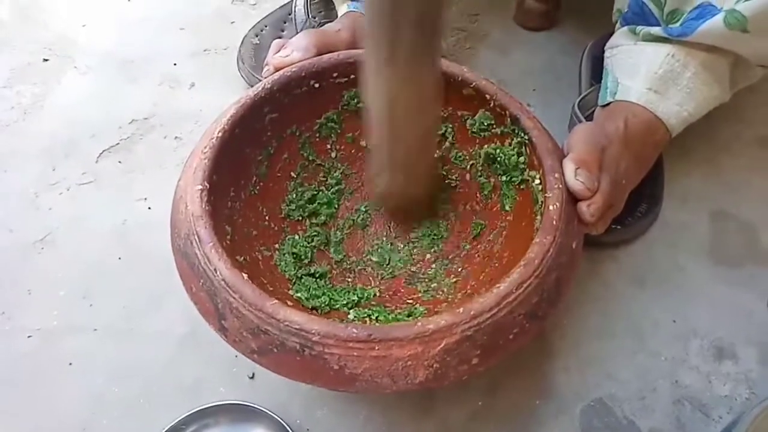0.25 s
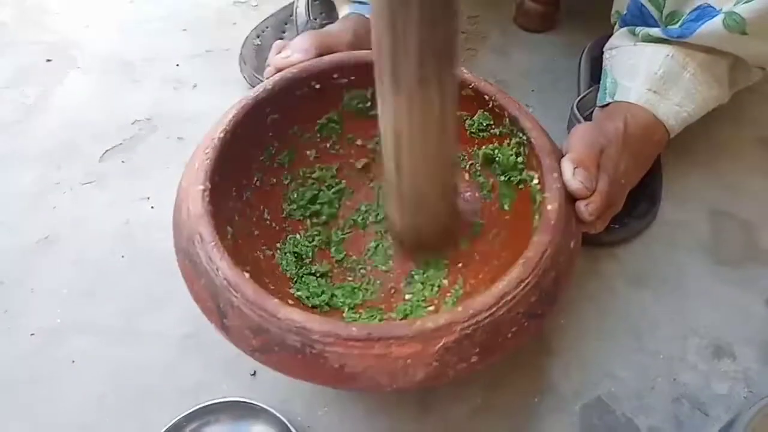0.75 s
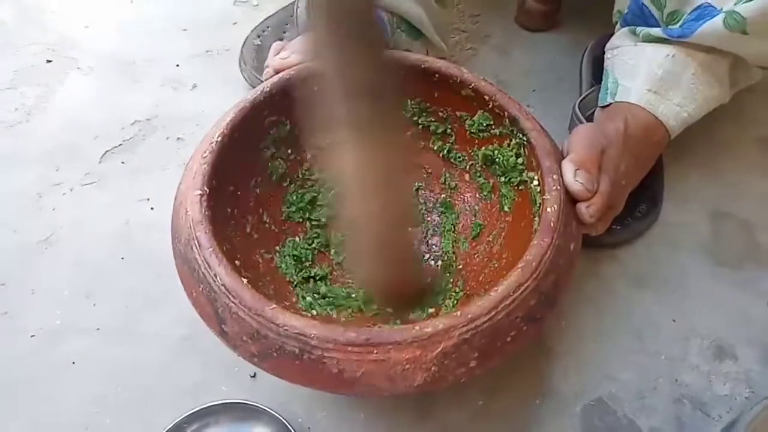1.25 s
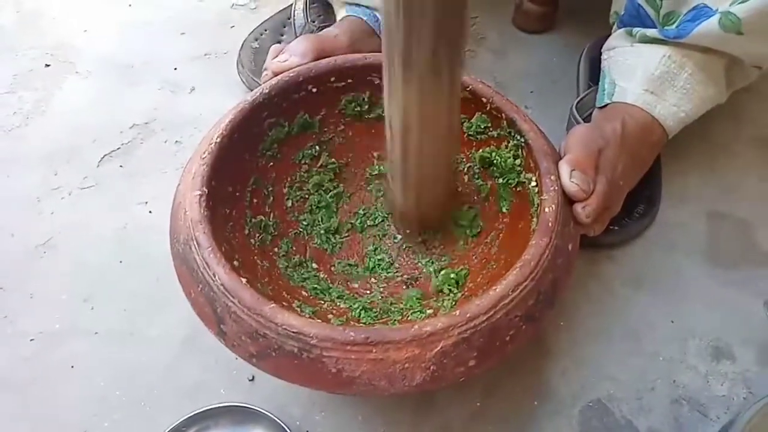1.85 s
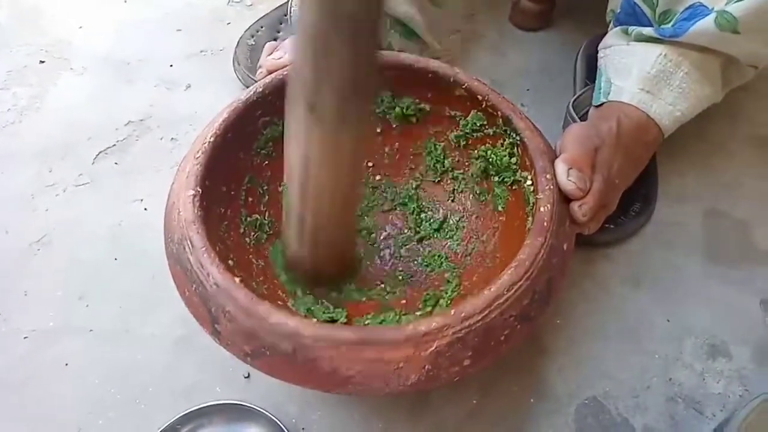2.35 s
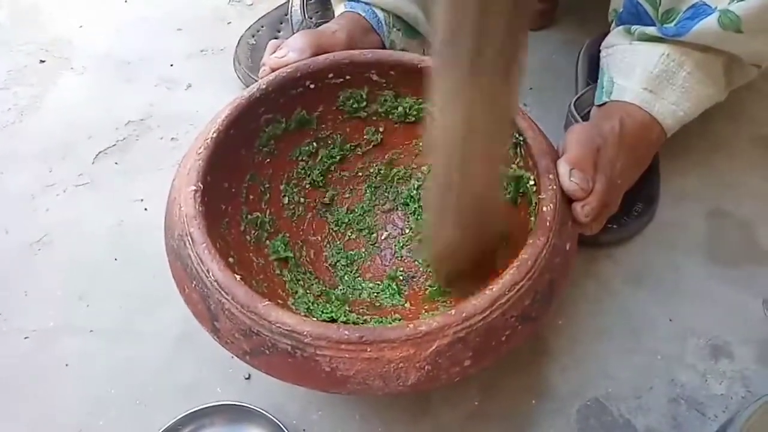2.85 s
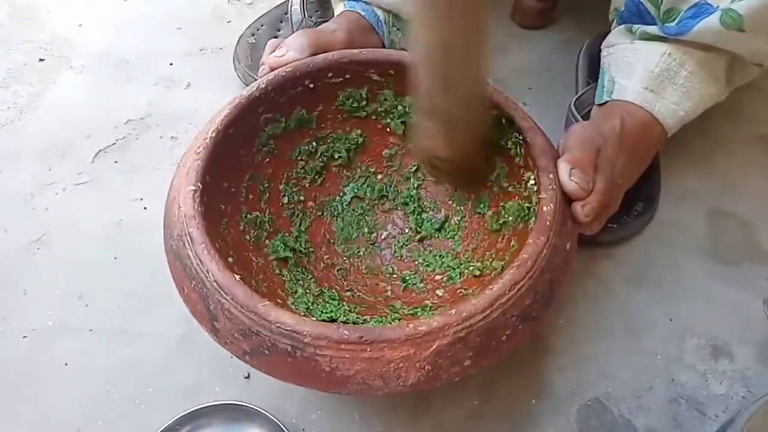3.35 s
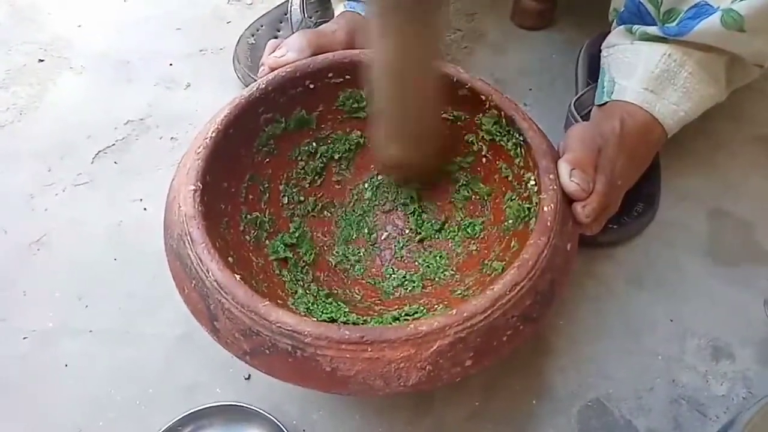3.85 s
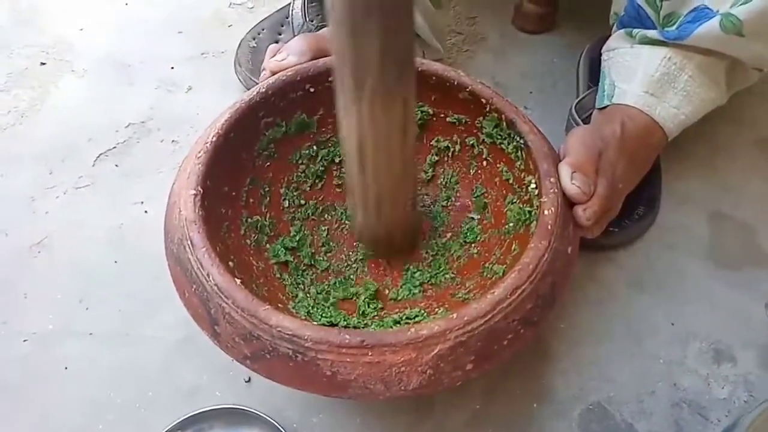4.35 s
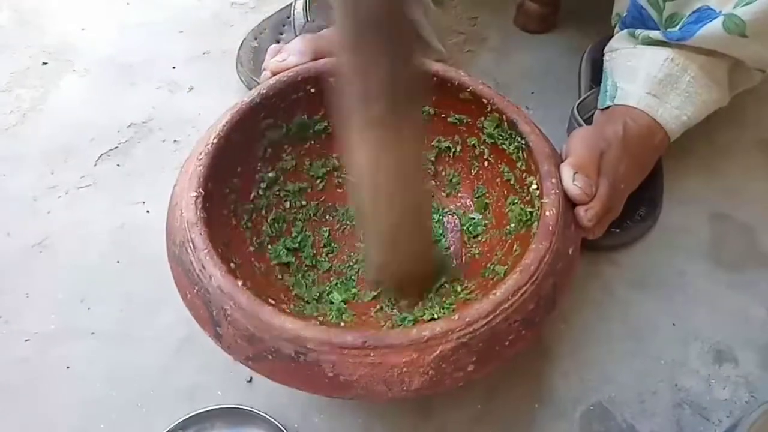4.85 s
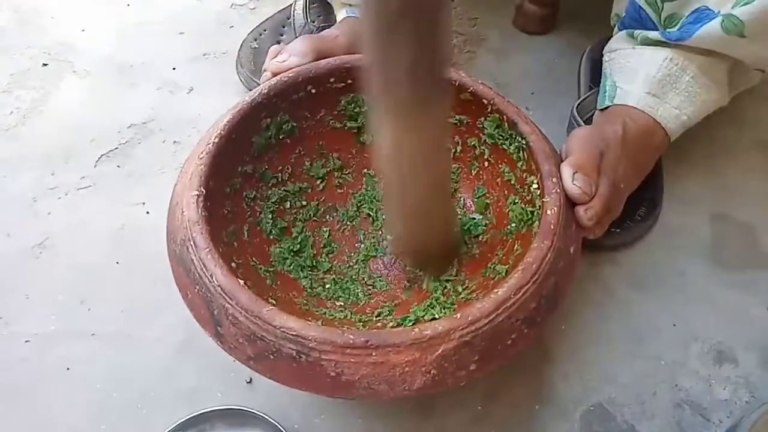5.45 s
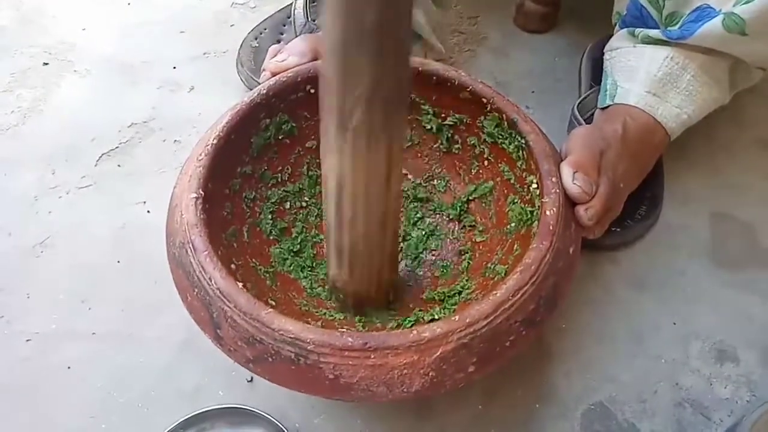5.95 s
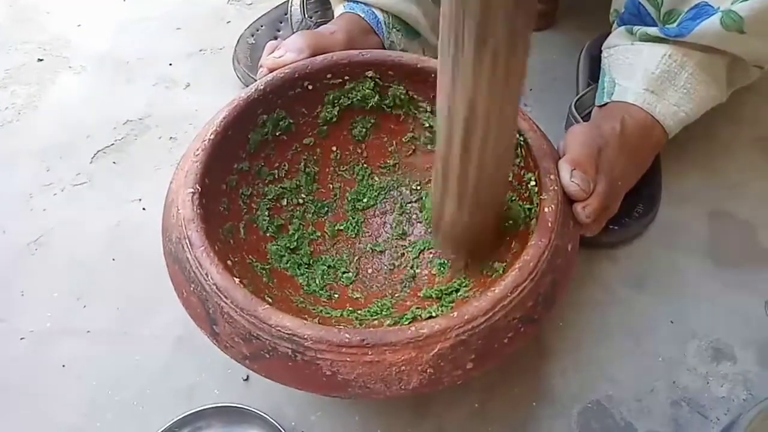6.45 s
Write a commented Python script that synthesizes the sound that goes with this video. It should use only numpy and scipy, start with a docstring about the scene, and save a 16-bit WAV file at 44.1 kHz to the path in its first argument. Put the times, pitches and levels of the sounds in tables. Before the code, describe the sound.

A wooden pestle works wet chopped herbs in a wide clay mortar, about four strokes a second from start to finish. Dull, hollow knocks and low thuds alternate with lighter gritty scrapes along the bowl. The paste crunches, leaves crackle, and seeds and stalks give occasional tiny snaps. The sound is close, with a very short reflection from nearby walls and a faint, steady outdoor hum and hiss.

```python
"""A long wooden pestle swings round a wide clay mortar on a concrete floor, about four strokes a second.
It bumps and skids over wet herbs: knocks and grit ring the same modes of bowl and pestle, from a low
floor thud up to a hard click. The paste crunches, leaves crackle, and seeds and stalks snap on top.
Nearby walls give a short tail, over a bed of outdoor murmur and hiss."""
import sys
import numpy as np
from scipy import signal
from scipy.fft import rfft, irfft, next_fast_len
from scipy.io import wavfile
from scipy.ndimage import map_coordinates

SR = 44100
rng = np.random.default_rng(int(sys.argv[2]) if len(sys.argv) > 2 else 0)


def generate_wav(sig):
    """Save sig (samples, or channels by samples) to the path in sys.argv[1] as 16-bit PCM at SR."""
    pcm = np.round(np.clip(np.atleast_2d(sig).T, -1, 1) * 32767).astype(np.int16)
    wavfile.write(sys.argv[1], SR, pcm)


N = 295029

# The heavy push of each round: (peak time [s], weight [dB], rasp [dB], crunch [dB], base fade [s])
HEAVY_PUSHES = [(0.005, -36.5, -34.5, -46, 0.058), (0.139, -20, -37, -36, 0.1),
                (0.383, -19.5, -42, -36, 0.15), (0.767, -25.5, -33.5, -42, 0.13),
                (0.996, -26.5, -34.5, -34, 0.095), (1.264, -21, -30, -42.5, 0.073),
                (1.537, -25, -37.5, -38, 0.065), (1.793, -19.5, -42.5, -35.5, 0.13),
                (2.033, -26.5, -36.5, -32.5, 0.1), (2.35, -21.5, -35, -32, 0.1),
                (2.654, -22, -33.5, -31, 0.2), (2.923, -20, -33, -30.5, 0.14),
                (3.215, -20, -32.5, -37, 0.25), (3.494, -28, -35.5, -36.5, 0.11),
                (3.745, -19, -29, -33.5, 0.09), (3.997, -20.5, -37, -40, 0.18),
                (4.256, -24.5, -42, -35, 0.082), (4.605, -29.5, -33, -40.5, 0.1),
                (4.871, -36, -34.5, -32.5, 0.081), (5.141, -20, -35, -40.5, 0.21),
                (5.42, -23.5, -42.5, -36, 0.11), (5.661, -17.5, -39, -36.5, 0.075),
                (5.927, -15.5, -37.5, -37.5, 0.17), (6.218, -16, -43, -39.5, 0.15),
                (6.556, -20, -38, -36, 0.12)]
# Lighter drags along the bowl: (peak time [s], weight [dB], rasp [dB], crunch [dB], base fade [s])
LIGHT_DRAGS = [(.242, -22, -47, -45, 0.053), (.519, -28, -31, -46, 0.059), (.579, -41, -35.5, -40, 0.17),
               (.685, -29, -32.5, -46.5, .067), (.93, -42, -39.5, -51, 0.11), (1.1, -47, -38, -50, .16),
               (1.321, -25.5, -56, -50.5, .12), (1.39, -35, -37, -51, 0.13),
               (1.639, -29, -39.5, -46, 0.081), (1.908, -23, -28.5, -49, 0.049),
               (2.147, -18, -30, -37.5, 0.07), (2.427, -28, -32, -36, 0.096), (2.59, -32, -38, -44, 0.057),
               (3.03, -34, -38.5, -53, 0.079), (3.13, -32, -42, -45.5, 0.1), (3.33, -36, -36, -58, .08),
               (3.435, -33, -40, -45, .1), (3.59, -47, -36.5, -50, 0.071), (3.813, -29.5, -37, -38, 0.092),
               (4.098, -25, -35, -36.5, 0.044), (4.351, -31.5, -43, -38, 0.21), (4.509, -37, -36, -45, .12),
               (4.673, -42, -36.5, -40.5, 0.18), (4.804, -42, -39, -52, 0.049),
               (4.929, -23, -42, -43, .083), (5.016, -43, -37, -47.5, 0.15), (5.25, -31, -43, -44.5, .11),
               (5.517, -36, -34, -37.5, 0.04), (5.738, -28, -46, -56, 0.14), (5.79, -39, -41, -49, 0.058),
               (6.049, -21.5, -40, -44, 0.088), (6.343, -33, -44, -46, .08), (6.64, -52, -39, -48, .071)]
# The pestle eases off the paste: (landing time [s], time off [s], base depth [dB])
PESTLE_LIFTS = [(.088, 0.06, -12.5), (0.346, 0.054, -13), (0.469, 0.025, -8), (1.17, 0.046, -3),
                (1.48, 0.046, -8.5), (1.991, 0.057, -13), (2.09, 0.012, -6), (2.289, 0.073, -11),
                (2.549, 0.072, -7), (2.83, 0.093, -4), (3.11, 0.042, -4.5), (3.409, 0.1, -7.5),
                (3.66, 0.039, -13.5), (3.95, 0.051, -12), (4.065, 0.022, -7), (4.22, 0.052, -12.5),
                (4.32, .025, -12), (4.79, 0.024, -5.5), (5.07, .03, -5.5), (5.33, 0.065, -0.5),
                (5.628, .05, -7), (5.86, .02, -10.5), (5.999, .03, -11.5), (6.168, 0.04, -7.5),
                (6.45, .05, -11)]
# The pestle bumps the bowl: (time [s], level [dB], thud offset [dB], upper bowl offset [dB])
PESTLE_KNOCKS = [(0.106, -9.5, -19, -18), (0.122, -8, -3, -20), (0.137, 0.5, -19, -36),
                 (0.213, -9.5, -17, -20), (0.239, -8, -19, -4.5), (0.361, -20.5, 3.5, -19),
                 (0.373, -5, -7, -11), (0.381, -2, -10.5, -13), (0.514, -14, -32, -11),
                 (0.526, -15.5, -17, 1), (0.681, -11.5, -18, -6.5), (0.761, -3, -33, -14),
                 (0.783, -7.5, -30, -5.5), (0.975, -7.5, -8, -10.5), (0.997, -2.5, -14.5, -12.5),
                 (1.026, -10.5, -16, -22), (1.096, -20, -20, 2), (1.25, -6, -15, -12),
                 (1.263, -12, -16, -11), (1.308, -13, -13, -13), (1.325, -11, -22, -2.5),
                 (1.529, -9.5, -9, -28), (1.614, -16, -22, -13), (1.764, -11.5, -14.5, -23),
                 (1.778, -4, -20, -18), (1.787, -4.5, -6, -18), (1.851, -12, -14, -22),
                 (1.902, -6.5, -32, -3.5), (1.993, -20.5, -8, -9), (2.027, -7.5, -6.5, -10),
                 (2.047, -8, -20, -19), (2.11, -14, -12, -21), (2.121, -5.5, -23, -17),
                 (2.144, -9.5, -28, -3), (2.166, -7.5, -25, -8), (2.189, -17, -14, 0.5),
                 (2.308, -14, -9, -5.5), (2.333, -6.5, -9, -10), (2.353, -9, -7.5, -22),
                 (2.427, -12, -28, -6), (2.468, -15, -22, -0.5), (2.615, -9, -4.5, -10),
                 (2.651, -4.5, -12.5, -28), (2.7, -20, -19, -15), (2.879, -6.5, -10, -14),
                 (2.919, -3.5, -13.5, -18), (2.987, -20, -13, -7), (3.195, -4.5, -4.5, -19),
                 (3.203, -4, -18, -15), (3.279, -22, -13, -4), (3.355, -20, -18, -0.5),
                 (3.453, -13, -8, -12), (3.49, -6, -13, -21), (3.531, -17, -23, -12),
                 (3.698, -13, -7.5, -19), (3.721, -3.5, -14, -8), (3.802, -19, -20, -16),
                 (3.993, -7.5, -2, -22), (4.017, -8.5, -10, -27), (4.076, -9.5, -21, -7),
                 (4.1, -9.5, -20, -20), (4.238, -8, -7, -23), (4.273, -8.5, -8.5, -35),
                 (4.347, -8, -15, -13), (4.509, -14, -18, -27), (4.593, -12, -11, -9.5),
                 (4.799, -13.5, -18, -15), (4.843, -12, -6, -16), (4.865, -9.5, -6.5, -10),
                 (4.886, -18, -10, -10), (4.922, -4, -25, -7), (5.122, -10, -9, -8.5),
                 (5.136, -13.5, -6, -14), (5.164, -21, -7, -22), (5.401, -5, -15, -24),
                 (5.418, -5.5, -9, -22), (5.447, -17, -16, -25), (5.512, -16, -26, -7),
                 (5.656, 0.5, -18, -12.5), (5.663, -4.5, -10, -11), (5.736, -13, -12.5, -21),
                 (5.925, -0.5, -13, -8.5), (6.028, -10, -12, -18), (6.05, -8.5, -22, -4),
                 (6.182, 0, -22, -8), (6.211, -7, -6.5, -8.5), (6.22, -3.5, -8.5, -17),
                 (6.296, -15, -24, -20), (6.341, -12, -18, -19), (6.519, -15, -2.5, -19),
                 (6.555, -5, -15, -18)]
# Thud of the mortar rocking on the floor: (frequency [Hz], width [Hz], level [dB])
THUD_MODES = [(130, 20, -10), (160.7, 47, -2), (192.4, 42.5, 5), (235, 56, 3), (248.6, 30.5, 0),
              (309.4, 30.4, -2.5)]
# Hollow body of the bowl: (frequency [Hz], width [Hz], level [dB])
BOWL_MODES = [(399, 88, -7.5), (471.7, 30, -8), (515.7, 89, 5), (579, 42.3, 1.5), (626, 42.5, 2),
              (740, 99, -4.5), (793, 39.6, -9)]
# Upper bowl tone: (frequency [Hz], width [Hz], level [dB])
UPPER_MODES = [(851, 46, -6.5), (961, 99, 0), (1045, 64.5, 2.5), (1159.4, 58, -2), (1277, 70, -4.5),
               (1399, 46, -12)]
# Bright ring of the rim: (frequency [Hz], width [Hz], level [dB])
RIM_MODES = [(1736, 69, -3), (1905, 118, -2.5), (2254, 142, 1), (2435, 74, 1.5), (2566, 142, -0.5),
             (2930, 210, -6.5)]
# Hard click on top: (frequency [Hz], width [Hz], level [dB])
CLICK_MODES = [(3125, 162, 2.5), (3340, 170, -0.5), (3810, 80, 0), (4220, 430, -13), (4557, 136, -1.5),
               (6200, 69, -19.5), (7190, 490, -9.5)]
# Tone of the crunching paste: (frequency [Hz], level [dB])
CRUNCH_EQ = [(1500, -59.5), (3000, 5.5), (4000, 15), (5000, -8.5), (7500, 2.5), (8500, -51), (11000, -52.5),
             (14000, -24.5), (16000, -36.5)]
# Tone of the leaf crackle: (frequency [Hz], level [dB])
CRACKLE_EQ = [(2000, -30.5), (3500, 4.5), (7500, -16), (9500, -24), (13000, -21), (16000, -26.5)]
# Tone of the background bed: (frequency [Hz], level [dB])
AIR_EQ = [(15, -46), (25, -16.5), (120, -0.5), (588, -5), (1060, -23.5), (1550, -23.5), (2460, -26),
          (3780, -30), (15800, -83.5)]
# Tail off the walls: (frequency [Hz], time to lose 60 dB [s])
WALL_DECAY = [(150, 0.25), (1000, 0.14), (8000, 0.057)]
# Seeds and stalks breaking: (time [s], strength [dB])
SEED_SNAPS = [(0.3727, -28.5), (0.4838, -31), (0.501, -25.5), (0.5462, -47), (0.579, -26), (0.9724, -30.5),
              (1.0273, -18.5), (1.0424, -25), (1.3084, -29.5), (1.4995, -31), (1.7653, -25), (2.0168, -27),
              (2.144, -20), (2.3427, -28.5), (2.4196, -23), (2.6469, -21), (2.6973, -25), (2.8966, -25),
              (2.9195, -7), (2.9557, -27), (3.1217, -35), (3.2726, -25), (3.491, -19.5), (3.744, -25.5),
              (4.0764, -23), (4.2285, -27.5), (4.328, -21.5), (4.348, -15), (5.6456, -24.5), (5.916, -27.5),
              (6.5967, -20.5)]

# Each set of four runs: thud, bowl, rasp, crunch.
TOUCH_DB = (-38, -41, -50.5, -59.5)  # the pestle never quite leaves the paste
PUSH_RISE_S, DRAG_RISE_S = (0.057, 0.058, 0.17, .08), (0.034, 0.025, 0.036, .05)  # time to gain 20 dB
FADE_SHARE = (0.63, 0.95, 0.96, 0.6)  # times the base fade: time to lose 20 dB
LIFT_SHARE = (0.42, 0.52, 0.8, 0.99)  # of a lift's base depth

PUSH_THUD_DB, DRAG_THUD_DB = -4.5, -6  # floor thud against the weight
SCATTER_DB, DRIFT_DB = 2.5, 4  # spread of a mode's share per knock and while rubbing
HARD_DB, HARD_GROWS = -25.5, 0.43  # rim and click follow a knock's level only in part
SNAP_TOP_DB, SNAP_TOP_GROWS = -46, .3  # likewise the treble of a snap
TOP_HZ = 15830


def amp(db):
    """Decibels to gain."""
    return 10 ** (np.asarray(db) / 20)


def unit(x):
    """Level x to rms 1."""
    return x / np.sqrt(np.mean(x ** 2) + 1e-20)


def along(points, hz):
    """Read a curve of (frequency [Hz], value) points on a log axis."""
    freqs, values = np.transpose(points)
    return np.interp(np.log(hz + 1), np.log(freqs + 1), values)


def wobble(rate):
    """A bounded random modulator, rate knots a second."""
    knots = np.clip(rng.standard_normal(int(N * rate / SR) + 4), -2.5, 1.5)
    return map_coordinates(knots, [np.arange(N) * rate / SR], order=1)


def filtered(x, response):
    """Apply a gain that depends on frequency."""
    size = next_fast_len(N + 8192)
    return irfft(rfft(x, size) * response(np.fft.rfftfreq(size, 1 / SR)), size)[..., :N]


def coloured(x, eq):
    """Shape x with an EQ curve, then level it to rms 1."""
    return unit(filtered(x, lambda hz: amp(along(eq, hz))))


def butter(x, order, hz, kind):
    """Butterworth filter."""
    return signal.sosfilt(signal.butter(order, hz, kind, fs=SR, output="sos"), x)


def swell(times, levels_db, rise_s, fades_s):
    """Envelope of contacts that build to a peak and ease off."""
    t, out = np.arange(0, N, 32) / SR, 0
    for at, db, fade in zip(times, levels_db, fades_s):
        out = out + amp(db - 20 * np.maximum((at - t) / rise_s, (t - at) / fade))
    return np.interp(np.arange(N) / SR, t, out)


def pressure():
    """Pushes and drags drive four envelopes, ducked by the lifts: thud, bowl, rasp, crunch."""
    total, duck_db = [amp(db) for db in TOUCH_DB], lifts()
    strokes = (HEAVY_PUSHES, PUSH_RISE_S, PUSH_THUD_DB), (LIGHT_DRAGS, DRAG_RISE_S, DRAG_THUD_DB)
    for rows, rises, thud_db in strokes:
        times, weight, rasp, crunch, fade = np.transpose(rows)
        for k, db in enumerate([weight + thud_db, weight, rasp, crunch]):
            total[k] = total[k] + swell(times, db, rises[k], FADE_SHARE[k] * fade)
    return [envelope * amp(share * duck_db) for envelope, share in zip(total, LIFT_SHARE)]


def grit(rate, spread_db, bed):
    """Sparse contacts of uneven size on a bed of fine rubbing, rms 1."""
    hit = rng.random(N) < rate / SR
    size = np.minimum(rng.exponential(size=N), 3)
    fine = rng.standard_normal(N)
    return unit(unit(hit * amp(spread_db * size) * np.sign(fine)) + bed * fine)


def ring(push, hz, width):
    """A damped mode; a unit blow rings it with amplitude 1."""
    radius, angle = np.exp(-np.pi * width / SR), 2 * np.pi * hz / SR
    return signal.lfilter([0, np.sin(angle)], [1, -2 * radius * np.cos(angle), radius * radius], push)


def resonance(modes, knock_db, rub, squash_s, squash_db, top_hz):
    """Knocks and rubbing ring one set of modes; the moving contact point changes each mode's share."""
    at = np.round(np.transpose(PESTLE_KNOCKS)[0] * SR).astype(int)
    _, widths, levels = np.transpose(modes)
    rub = rub / np.sqrt(np.sum(amp(2 * levels) * SR / (4 * np.pi * widths)))  # offset the modes' gain
    scatter = rng.standard_normal((len(at), len(modes), 2))
    age = np.arange(SR // 10) / SR / squash_s
    blows = np.bincount(at, amp(knock_db + squash_db), N)
    # paste squeezed under each blow
    squash = signal.fftconvolve(blows, age * np.exp(-age) / np.sqrt(squash_s * SR))[:N]
    out = np.zeros(N)
    for k, (hz, width, db) in enumerate(modes):
        push = (-1) ** k * rub * amp(DRIFT_DB * wobble(35)) + squash * rng.standard_normal(N)
        late = (at + np.abs(scatter[:, k, 1]) * SR / hz).astype(int)  # each mode is hit a little apart
        push[late] += amp(knock_db + SCATTER_DB * scatter[:, k, 0])
        out += amp(db) * ring(push, hz, width)
    return butter(out, 4, top_hz, "lowpass")  # wood on paste is a soft contact


def mortar():
    """Pestle on clay and wet herbs: low modes take lumpy pushes, high modes fine grit."""
    thud, bowl, rasp, crunch = pressure()
    _, knock_db, thud_db, upper_db = np.transpose(PESTLE_KNOCKS)
    hard_db = HARD_DB + HARD_GROWS * knock_db
    lumps = amp(2.23 * wobble(45)) * grit(200, 3.8, bed=0.82)
    squish = amp(3 * wobble(75))  # wet paste grips and lets go
    low = resonance(THUD_MODES, knock_db + thud_db - 5.5, amp(-1) * thud * lumps,
                    squash_s=0.0058, squash_db=5.6, top_hz=500)
    body = resonance(BOWL_MODES, knock_db - 12, amp(-1) * bowl * lumps,
                     squash_s=0.0028, squash_db=1.3, top_hz=1180)
    upper = resonance(UPPER_MODES, knock_db + upper_db - 6, amp(-1.5) * np.sqrt(bowl * rasp) * lumps,
                      squash_s=0.0067, squash_db=1.3, top_hz=1500)
    rim = resonance(RIM_MODES, hard_db - 9, amp(-2) * rasp * squish * grit(500, 5.3, bed=0.35),
                    squash_s=0.0052, squash_db=5.6, top_hz=3400)
    click = resonance(CLICK_MODES, hard_db - 17, amp(-3) * crunch * squish * grit(400, 10.6, bed=0.37),
                      squash_s=0.02, squash_db=4.5, top_hz=9400)
    herbs = amp(-10.5) * paste_crunch(crunch * squish) + amp(-26.5) * leaf_crackle(crunch ** 0.58)
    return low + body + upper + rim + click + herbs


def paste_crunch(envelope):
    """Paste ground under the pestle: bright grit with a fast flicker."""
    grains = coloured(grit(1100, 13.0, bed=0.88), CRUNCH_EQ)
    return envelope * amp(6.7 * wobble(90)) * grains


def leaf_crackle(envelope):
    """Wet leaves pop in clumps, each pop a few milliseconds of noise; more pressure, louder pops."""
    t = np.arange(SR // 100) / SR
    pops = signal.fftconvolve(np.abs(grit(260, 7.0, bed=0.091)), amp(-60 * t / 0.016))[:N]
    clumps = amp(6.4 * wobble(35))
    return envelope * coloured(clumps * pops * rng.standard_normal(N), CRACKLE_EQ)


def air():
    """A steady bed of outdoor murmur and microphone hiss."""
    return amp(-37.5) * coloured(rng.standard_normal(N), AIR_EQ)


def walls(x):
    """Nearby walls answer after a short pre-delay; the highs die first."""
    hz, t, spectrum = signal.stft(rng.standard_normal(SR // 3), SR, nperseg=256)
    decay = amp(-60 * t / along(WALL_DECAY, hz)[:, None])
    tail = signal.istft(spectrum * decay, SR, nperseg=256)[1]
    return signal.fftconvolve(np.pad(x, (250, 0)), tail / np.linalg.norm(tail))[:N]


def lifts(ease_s=0.018, land_s=0.008):
    """Base ducking curve in dB as the pestle lifts: a slow ease off, a quick landing."""
    t = np.arange(N) / SR
    return sum(np.interp(t, [at - off - ease_s, at - off, at, at + land_s], [0, db, db, 0])
               for at, off, db in PESTLE_LIFTS)


def snaps():
    """Seeds and stalks break: short noise bursts, a crack with a bright top."""
    bands, t = np.zeros((2, N + SR)), np.arange(SR // 50) / SR
    for at, db in SEED_SNAPS:
        burst = amp(-60 * t / 0.0055) * rng.standard_normal((2, len(t)))
        gains = amp([[db + 2.5], [SNAP_TOP_DB + SNAP_TOP_GROWS * db]])
        start = round(at * SR)
        bands[:, start:start + len(t)] += burst * gains
    crack = butter(bands[0], 3, [2500, 6000], "bandpass")
    top = butter(bands[1], 3, 10000, "highpass")
    return (crack + top)[:N]


def scene():
    """Mono mix: mortar and snaps up close, walls and air behind."""
    near = butter(mortar() + snaps(), 4, 135, "highpass")  # a small bowl radiates no deep bass
    return (near + amp(-14.5) * walls(near) + air())[None]


def record(dry):
    """A small microphone: weak bass, soft overload, band limit."""
    thin = butter(dry, 2, 75, "highpass")
    soft = thin / (1 + np.abs(thin / .9) ** 8) ** (1 / 8)
    return filtered(soft, lambda hz: hz < TOP_HZ)


dry = scene()
out = record(dry)
generate_wav(out)
```